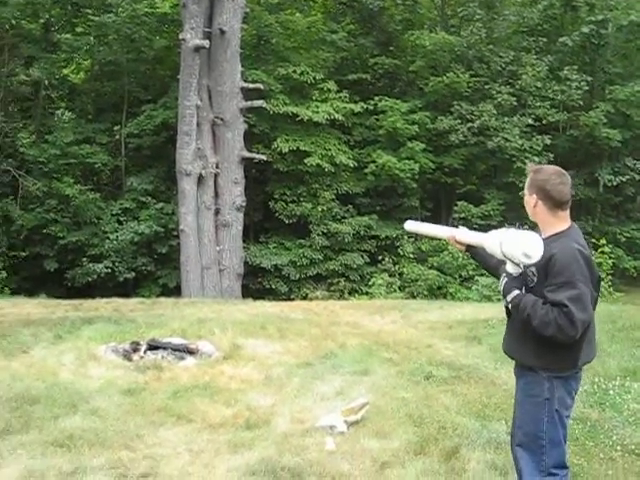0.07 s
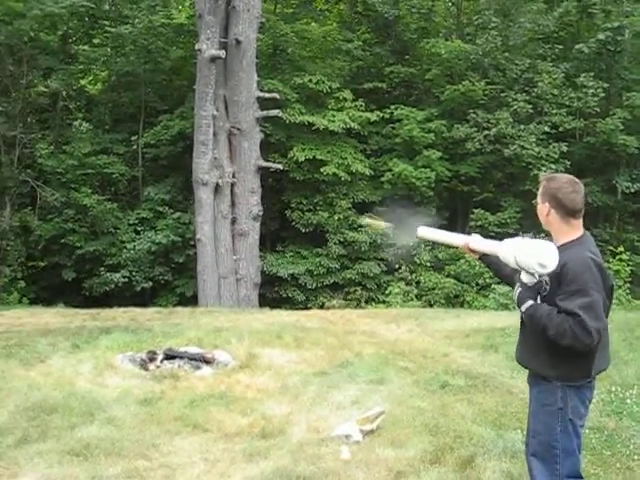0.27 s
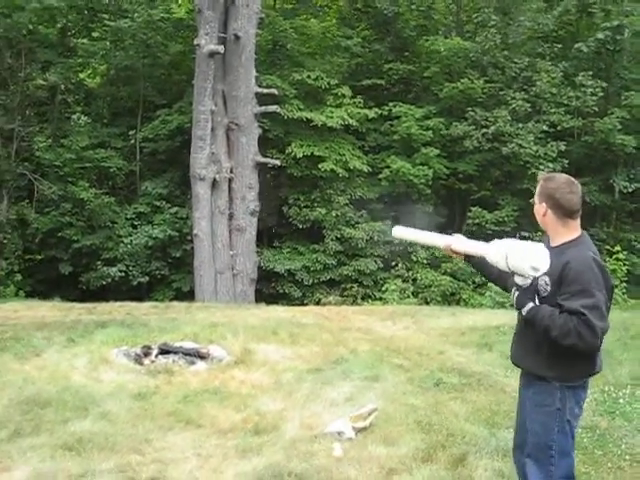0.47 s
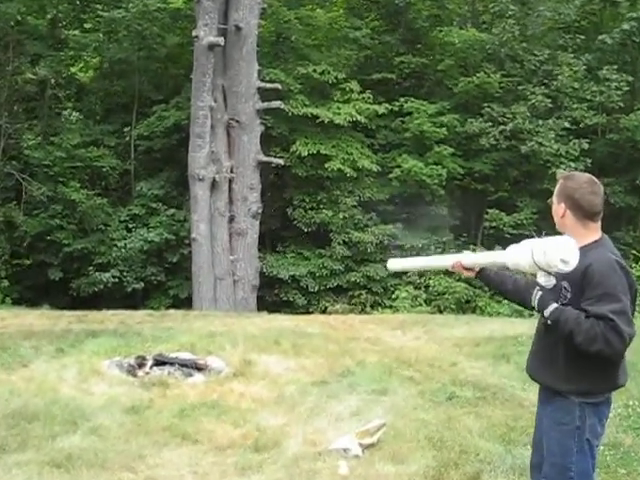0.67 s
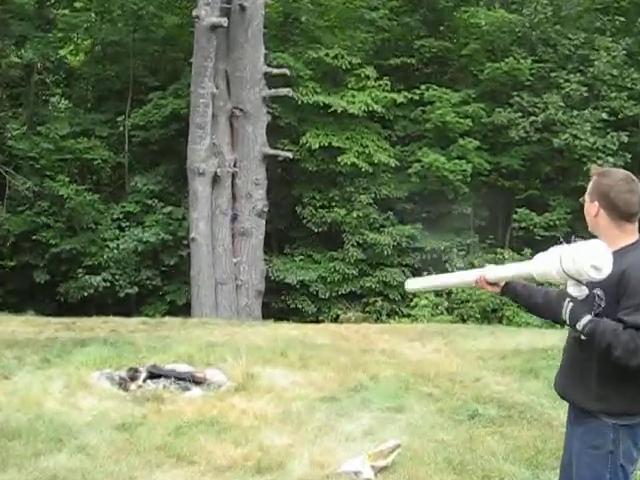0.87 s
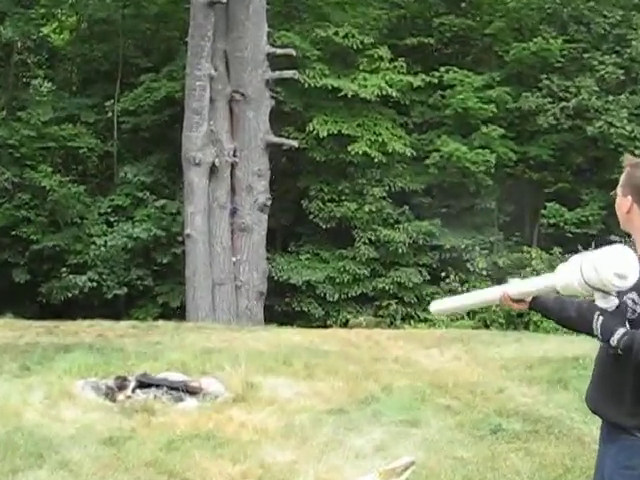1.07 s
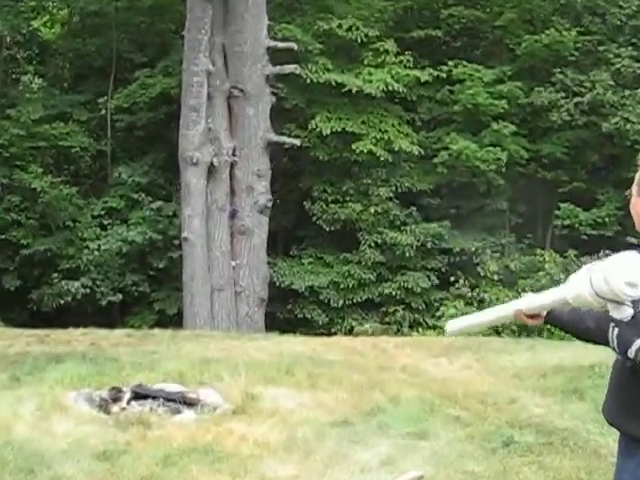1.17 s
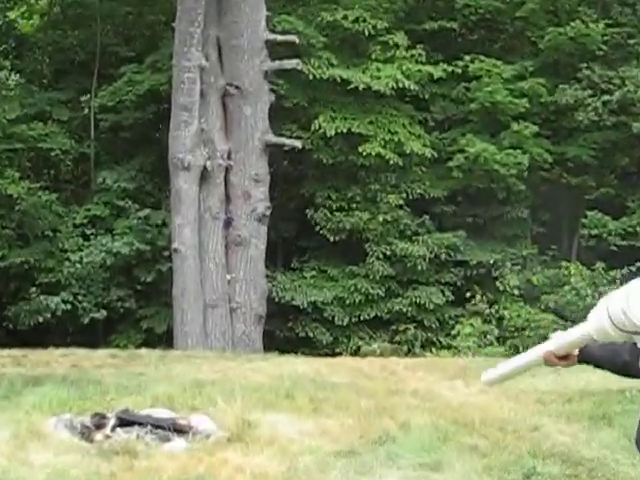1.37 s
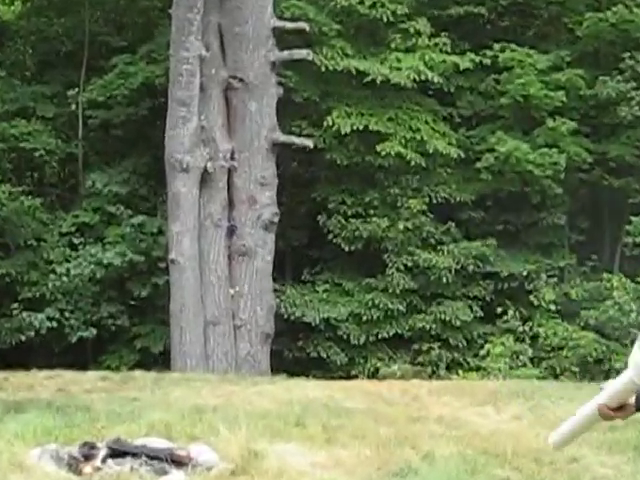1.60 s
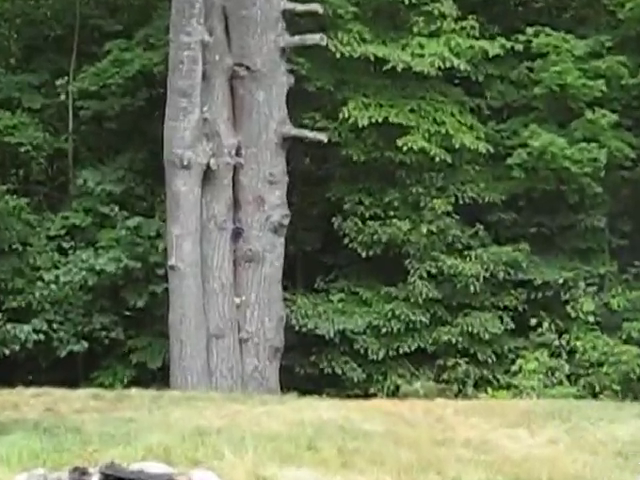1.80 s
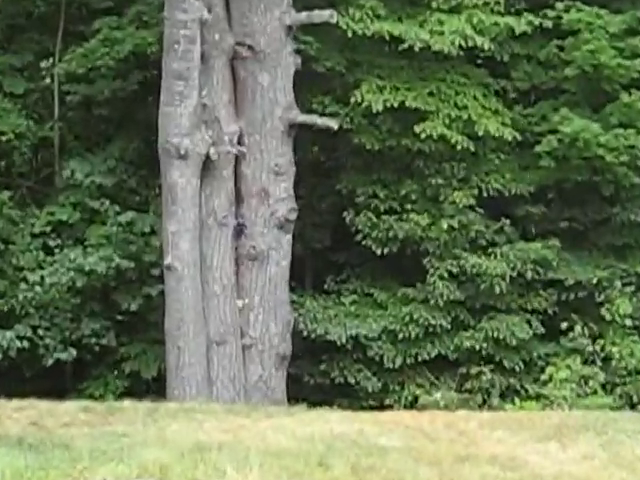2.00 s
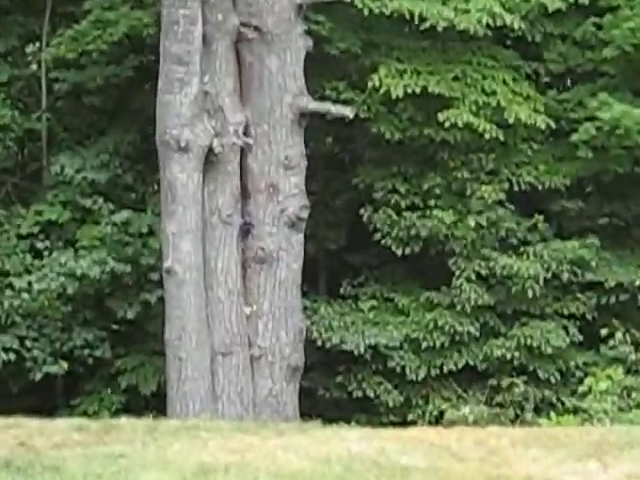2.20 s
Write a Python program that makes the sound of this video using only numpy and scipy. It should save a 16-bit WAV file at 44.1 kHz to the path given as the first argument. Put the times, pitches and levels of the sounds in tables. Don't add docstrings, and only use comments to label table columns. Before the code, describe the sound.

Close launcher blast outdoors, starting with a hard click and short gas whoosh, followed a quarter second later by a louder wooden crack, then a fading roar through trees over steady low air noise, lo-fi and overloaded.

```python
import sys
import numpy as np
from scipy import signal
from scipy.io import wavfile
from scipy.ndimage import uniform_filter1d

SR = 44100
rng = np.random.default_rng(int(sys.argv[2]) if len(sys.argv) > 2 else 0)


def linear_from_db(decibels):
    return 10 ** (np.asarray(decibels, float) / 20)


def wav_out(sig):
    wavfile.write(sys.argv[1], SR, np.round(np.clip(np.atleast_2d(sig).T, -1, 1) * 32767).astype(np.int16))


N = 99225


def read(points, hz):
    point_hz, value = np.transpose(points)
    return np.interp(np.log(hz + 1), np.log(point_hz + 1), value)


def curve(points, t):
    start_s, level_db = np.transpose(points)
    return linear_from_db(np.interp(t, start_s, level_db, left=-120))


def bumps(table, hz):
    return sum(db / (1 + (2 * (hz - centre) / width) ** 2) for centre, width, db in table)


def add(mix, start_s, sound):
    part = mix[round(start_s * SR):][:len(sound)]
    part += sound[:len(part)]


def noise(colour_db, patchy_db, flicker_db, size=512):
    frames = 4 * N // size + 5
    hz = np.fft.rfftfreq(size, 1 / SR)[:, None]
    real, imaginary, patches = rng.standard_normal((frames, len(hz), 3)).T
    patches = uniform_filter1d(patches, size=5, axis=0)
    patches = uniform_filter1d(patches, size=12, axis=1)
    flicker = uniform_filter1d(rng.standard_normal(frames), size=3)
    db = colour_db(hz, np.arange(frames) * size / 4 / SR)
    db = db + patchy_db * patches / patches.std() + flicker_db * flicker
    return (real + 1j * imaginary) * linear_from_db(db)


def sound_of(spectra, from_s, to_s):
    size = 2 * len(spectra) - 2
    x = signal.istft(spectra, nperseg=size, noverlap=size - size // 4)[1][:N]
    return x / x[int(from_s * SR):int(to_s * SR)].std()


def low_noise(from_hz, to_hz):
    band = signal.butter(2, [from_hz, to_hz], "band", fs=SR, output="sos")
    low = signal.sosfilt(band, rng.standard_normal(N))
    return low / low.std()


# pitch_hz, level_db per Hz
AMBIENT_COLOUR = [(12, -41.5), (20, -14), (77, -5), (280, -12), (316, -16.5), (390, -10.5), (518, -16),
                  (1030, -16.5), (5600, -30), (7280, -68.5), (12300, -120)]
# pitch_hz, width_hz, level_db
HUM = [(75.1, 14, 3.5), (195.8, 8, 5), (330.5, 150, 3), (700, 250, 2), (1200, 300, 3), (1600, 400, -2)]


def air(t):
    def colour_db(hz, s):
        return read(AMBIENT_COLOUR, hz) + bumps(HUM, hz) + 0 * s

    wash = linear_from_db(-45.5) * sound_of(noise(colour_db, 1.2, .8, size=2048), 0, 2.2)
    rumble_hz, rumble_db, rumble_t60_s = 46, -42.5, 1.7
    rumble = low_noise(rumble_hz / 2, rumble_hz * 1.4)
    age = t - .2815
    return wash + (age > 0) * linear_from_db(rumble_db - 60 * age / rumble_t60_s) * rumble


# start_s, level_db
ECHO = [(.345, -54), (.362, -27), (.42, -28), (.47, -22), (.497, -31.5), (.6, -31.5), (.71, -29),
        (.9, -35.5), (1.3, -44)]
# pitch_hz, level_db per Hz
ECHO_COLOUR = [(24, -28), (40, -9.5), (310, -5.5), (449, -9), (1240, 0.5), (1650, -9), (1950, -6),
               (3070, -11), (5600, -18.5), (7280, -73), (12300, -120)]
# pitch_hz, width_hz, level_db
TUNES = [(150.5, 280, -8), (667.8, 150, 10.5), (1044, 250, 1.5), (1600, 440, -2.5), (1980, 250, 5.5)]


def trees(t):
    air_db_per_s, air_power = -12.5, .8
    tune_rise_s, fade_db_per_s = .21, -15

    def colour_db(hz, s):
        age = np.clip(s - ECHO[2][0], 0, 1.2)
        air_loss = air_db_per_s * age * (hz / 1000) ** air_power
        return read(ECHO_COLOUR, hz) + air_loss + bumps(TUNES, hz) * np.minimum(age / tune_rise_s, 1)

    spectra = noise(colour_db, 0.49, 1.6)
    loudness = np.sqrt(uniform_filter1d((abs(spectra) ** 2).mean(0), size=60))
    level = curve(ECHO, t) * linear_from_db(fade_db_per_s * np.maximum(t - ECHO[-1][0], 0))
    return level * sound_of(spectra / loudness, .4, 2.2)


def boom(t):
    rise_s, level_db, t60_s = .018, -24.5, .5
    age = np.maximum(t - .289, 0)
    return np.minimum(age / rise_s, 1) * linear_from_db(level_db - 60 * age / t60_s) * low_noise(70, 486)


# start_s, level_db
JET = [(.258, -47.5), (.27, -37), (.2805, -19.5), (.2815, -12), (.289, -19.5), (.297, -10.5),
       (.3025, -15.5), (.305, -36.5), (.33, -33.5)]
# start_s, level_db, t60_s
SLAP_HISS = [
    (0.3097, -27, 0.027),
    (0.3336, -19, 0.022),
]
# pitch_hz, level_db per Hz
JET_COLOUR = [(60, -24), (300, -13.5), (700, -5.5), (1100, -2.5), (2300, -2.5), (3400, -6.5), (4500, -12.5),
              (5600, -12), (7000, -22)]


def jet(t):
    level = curve(JET, t) * linear_from_db(-300 * np.maximum(t - JET[-1][0], 0))
    for start_s, level_db, t60_s in SLAP_HISS:
        level = level + (t > start_s) * linear_from_db(level_db - 60 * abs(t - start_s) / t60_s)

    def colour_db(hz, s):
        darken_db = -120 * np.clip(s - .29, -.02, .03)
        return read(JET_COLOUR, hz) + darken_db * np.log2((hz + 300) / 1500)

    return level * sound_of(noise(colour_db, 2.5, 5.5, size=128), 0.24, 0.33)


def add_pulses(out, table):
    for start_s, level_db, pitch_hz, cycles in table:
        turn = np.arange(0, cycles, pitch_hz / SR)
        swell = np.sin(np.pi * (turn / cycles) ** .7)
        add(out, start_s, -linear_from_db(level_db) * swell * np.sin(2 * np.pi * turn))


# start_s, level_db, pitch_hz, cycles
PUSHES = [(.141, -34, 150, 3.5), (.17, -40, 140, 7.0), (.300, -24, 52, 3.0), (.3105, -17, 310, 3.0),
          (.385, -30, 92, 4.0), (.55, -43, 37, 13.0), (1.18, -39, 50, 7.0), (2.11, -45, 78, 8.0)]


def pushes():
    out = np.zeros(N)
    add_pulses(out, PUSHES)
    return out


# start_s, level_db, pitch_hz,
# cycles
KNOCKS = [(.2810, -12, 2350, 5.6), (.2945, -14.5, 944, 5.8), (.2990, -15, 3300, 7.8),
          (.3102, -18, 1100, 2.3), (.3326, -13, 946, 1.26), (.3612, -21.5, 1200, 7.0),
          (0.4816, -13, 723, 3.7), (.486, -22, 700, 5.3), (.5108, -14, 1600, 2.5)]


def knocks():
    out = np.zeros(N)
    add_pulses(out, KNOCKS)
    return out


def ring(modes, pitch):
    t = np.arange(2000) / SR
    contact_s = .00022
    rings = sum(linear_from_db(db - 60 * t / t60) * np.sin(2 * np.pi * hz * pitch * t) for hz, db, t60 in modes)
    rings = rings * (1 - np.exp(-(t / contact_s) ** 2))
    return rings / abs(rings).max()


# pitch_hz, level_db, t60_s
TRUNK = [(300, -10, .007), (1050, -3, .01), (2100, 0, .006), (3100, -1, .008), (4700, -10, .003)]
# start_s, level_db, pitch_factor
CRACKS = [
    (.4769, -1.1, 1.0),
    (.4892, -24, 1.0),
    (.5109, -18, 1.15),
]


def trunk():
    out = np.zeros(N)
    for start_s, level_db, pitch in CRACKS:
        add(out, start_s, linear_from_db(level_db) * ring(TRUNK, pitch))
    return out


# pitch_hz, level_db, t60_s
IGNITER = [(1360, -5, .015), (2900, -1, .009), (3750, -3, .005), (4400, -1, .006), (5000, -1, .005)]
# start_s, level_db
SNAPS = [
    (.2242, -15),
    (.2256, -2.6),
    (.2288, -20),
]
# start_s, level_db, length_s
SNAP_PUSH = (.2255, -17, .0012)


def igniter():
    out = np.zeros(N)
    for start_s, level_db in SNAPS:
        add(out, start_s, -linear_from_db(level_db) * ring(IGNITER, 0.91))
    start_s, level_db, length_s = SNAP_PUSH
    add(out, start_s, linear_from_db(level_db) * np.hanning(int(length_s * SR)))
    return out


def scene():
    t = np.arange(N) / SR
    loud = igniter() + trunk() + knocks() + pushes() + jet(t) + trees(t) + boom(t)
    power_db = 10 * np.log10(abs(uniform_filter1d(loud ** 2, size=200)) + 1e-12)
    duck_from_db, duck_share, recover_db_per_s = -36.5, .18, 122.5
    fall = t * recover_db_per_s
    held_db = np.maximum.accumulate(power_db + fall) - fall
    over_db = np.maximum(held_db - duck_from_db, 0)
    duck = linear_from_db(duck_share * uniform_filter1d(over_db, size=200))
    return (loud + air(t) / duck)[None]


def roll_off(x):
    return signal.sosfilt(signal.butter(12, 16640, fs=SR, output="sos"), x)


def record(dry):
    ceiling = .707
    step = ceiling / 128
    anti_alias = signal.firwin(41, 6100, fs=SR)[None]
    low = signal.oaconvolve(dry, anti_alias, "same")[:, ::4]
    held = np.zeros_like(dry)
    held[:, ::4] = 4 * step * np.clip(np.round(low / step - .1), -128, 127)
    smoother = signal.firwin(129, 5500, window=("kaiser", 9), fs=SR)[None]
    smooth = signal.oaconvolve(held, smoother, "same")
    return roll_off(np.clip(smooth, -ceiling, ceiling))


dry = scene()
out = record(dry)
wav_out(out)
```